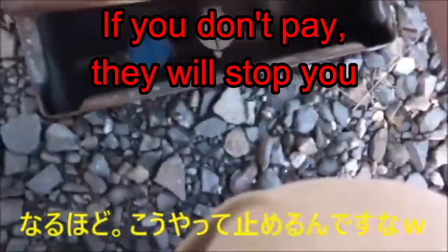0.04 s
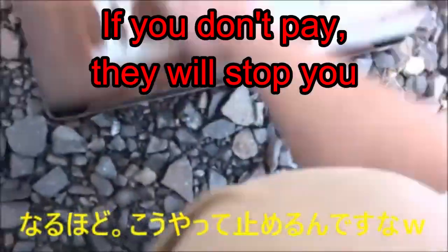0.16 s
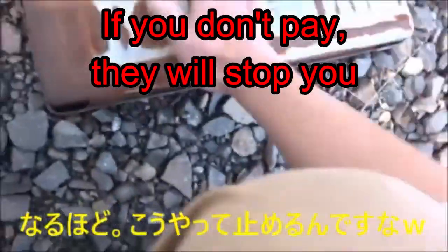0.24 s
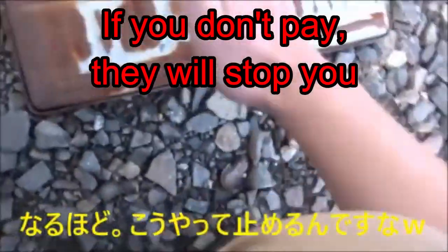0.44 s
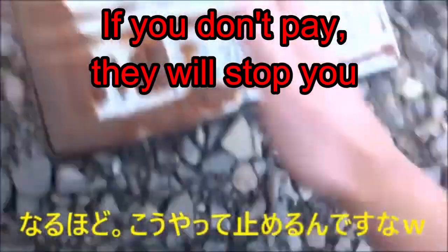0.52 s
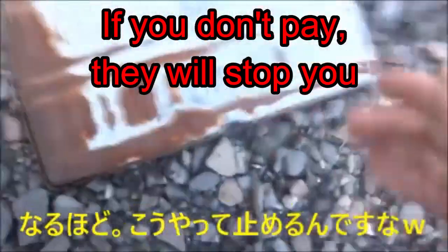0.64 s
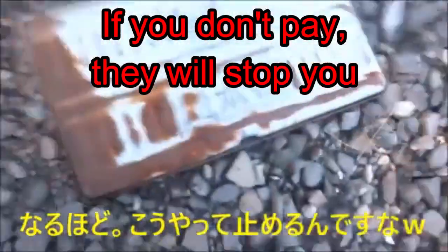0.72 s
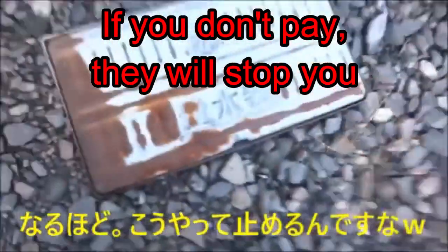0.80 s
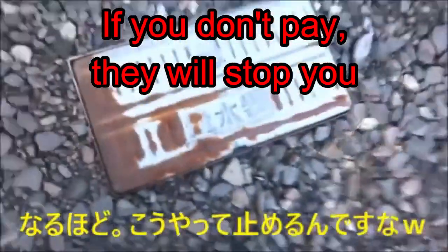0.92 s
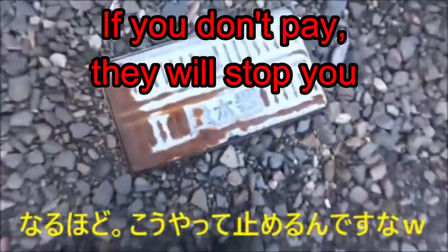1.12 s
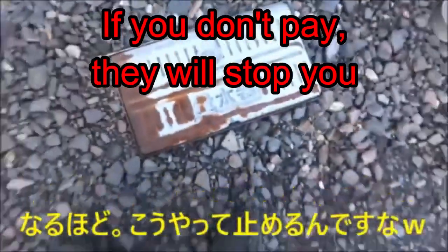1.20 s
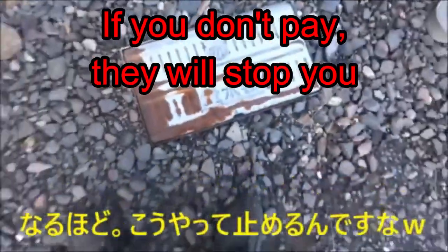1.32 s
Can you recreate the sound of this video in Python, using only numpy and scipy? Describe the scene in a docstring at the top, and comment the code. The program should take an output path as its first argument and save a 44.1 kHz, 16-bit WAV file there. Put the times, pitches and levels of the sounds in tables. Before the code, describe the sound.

A rusty metal lid slams shut on a hollow box outdoors. After a soft bump and gritty click at the start, it lands at about 0.2 seconds with a thump, then bounces, scrapes and squeals briefly as stones crunch below. It jams home around 0.45 seconds and rings out. Soft bumps and small clicks follow from 0.7 to 1 second, then light gravel scuffs near 1.3 seconds over quiet air.

```python
"""Over quiet outdoor air, a soft bump and a gritty click precede the slam of a rusty sheet-metal lid.
Its edge ticks on the rim and its box, standing on gravel, resonates with a hollow thump.
The lid bounces and scrapes, exciting the steel's modes; friction squeals and stones crunch below.
It jams home and rings out; soft bumps, small clicks and gravel scuffs follow.
The recorder's gain control, which ducks under the slam, recovers slowly to the end."""
import sys
import numpy as np
from scipy import signal
from scipy.fft import rfft, irfft
from scipy.io import wavfile
from scipy.ndimage import uniform_filter1d

SR = 44100
rng = np.random.default_rng(int(sys.argv[2]) if len(sys.argv) > 2 else 0)


def write(x):
    x = np.atleast_2d(x).T
    wavfile.write(sys.argv[1], SR, np.round(np.clip(x, -1, 1) * 32767).astype(np.int16))


N = 59535
TIME = np.arange(N) / SR


def undb(db):
    """Amplitude ratio of a level in decibels."""
    return 10 ** (np.asarray(db) / 20)

def fade(t, t60):
    """Exponential damping: 60 dB of decay in t60 seconds."""
    return np.exp(-np.log(1000) * np.maximum(t, 0) / t60)

def unit(x):
    """Normalisation to unit energy."""
    return x / np.sqrt(np.sum(x ** 2) + 1e-18)

def through(x, response):
    """Convolution: a linear system answers each input sample with its impulse response."""
    return signal.fftconvolve(x, response)[:N]

def colour(x, spectrum):
    """Minimum-phase filtering through points of (frequency [Hz], gain [dB])."""
    size = 4096
    hz, db = np.array(spectrum, float).T
    bin_hz = np.arange(size // 2 + 1) * SR / size
    gain = undb(np.interp(np.log(bin_hz + 1), np.log(hz), db))
    cepstrum = irfft(np.log(gain))
    cepstrum[1:size // 2] *= 2  # folding the cepstrum makes the filter causal
    cepstrum[size // 2 + 1:] = 0
    return through(x, irfft(np.exp(rfft(cepstrum))))

def noise(spectrum):
    """Spectral shaping of white noise, scaled to unit rms."""
    return unit(colour(rng.standard_normal(N), spectrum)) * np.sqrt(N)

def wander(rate_hz):
    """Random modulation: smoothed noise of unit standard deviation."""
    width = int(SR / rate_hz)
    smooth = uniform_filter1d(uniform_filter1d(rng.standard_normal(N), width), width)
    return smooth / smooth.std()

def resonance(start, hz, db, rise, t60):
    """Damped oscillator: a sine that swells linearly and decays exponentially."""
    t = np.maximum(TIME - start, 0)
    return undb(db) * np.minimum(t / rise, 1) * fade(t - rise, t60) * np.sin(2 * np.pi * hz * t)

def burst(start, db, t60, spectrum):
    """Broadband transient: noise with a sudden onset and exponential decay."""
    return undb(db) * (TIME >= start) * fade(TIME - start, t60) * noise(spectrum)

# Spectra of the air, mid and side (frequency [Hz], relative density [dB])
AIR_MID_SPECTRUM = [(25, -1.5), (70, 1.5), (150, -2), (280, -1), (450, -13), (800, -12), (1300, -26.5),
                    (3000, -25), (6000, -27), (10000, -27.5), (13000, -35.5)]
AIR_SIDE_SPECTRUM = [(30, -8.5), (150, -8.5), (400, -5), (700, -0.5), (1300, -11), (3000, -15.5),
                     (6000, -27), (10000, -27.5), (13000, -23.5)]
def outdoor_air():
    """Ambient noise: uncorrelated mid and side signals give a steady, low background its width."""
    return undb(-38.5) * noise(AIR_MID_SPECTRUM), undb(-48) * noise(AIR_SIDE_SPECTRUM)

# Handling bumps (time [s], frequency [Hz], level [dB], rise [s], t60 [s])
BUMP_MODES = [(0.004, 211.4, -32, 0.0062, .12), (0.66, 137, -9.5, 0.0063, 0.012),
              (0.703, 138, -15, 0.0033, 0.095), (0.735, 118, -13.5, 0.0022, .04),
              (0.7617, 193, -9, 0.0023, 0.029), (0.768, 98.4, -12, .004, 0.053)]
def handling_bumps():
    """Soft impacts excite only low, heavily damped resonances."""
    return sum(resonance(*row) for row in BUMP_MODES)

# Gravel scuffs (peak time [s], standard deviation [s], level [dB])
SCUFF_SWELLS = [(0.005, 0.035, -44.5), (0.668, 0.023, -41.5), (0.735, 0.061, -48), (1.19, 0.028, -47),
                (1.271, 0.019, -33), (1.345, 0.017, -35)]
# Spectrum of shifting stones (frequency [Hz], relative density [dB])
GRAVEL_SPECTRUM = [(300, -22), (1200, -10), (2400, 4.5), (4500, 1), (9000, 3.5), (13000, 0.5)]
def gravel_scuffs():
    """Granular friction: shifting stones give short swells of grainy noise."""
    swell = sum(undb(db) * np.exp(-.5 * ((TIME - peak) / width) ** 2)
                for peak, width, db in SCUFF_SWELLS)
    return swell * noise(GRAVEL_SPECTRUM) * undb(1.4 * wander(710))

# Clicks of metal and stone (time [s], frequency [Hz], level [dB], t60 [s])
CLICK_MODES = [(0.035, 9400, 0, 0.0015), (0.035, 5940, -19.5, 0.0036), (0.7975, 1925, -16, 0.0059),
               (0.989, 1700, -24, 0.0035)]
def small_clicks():
    """Hard, brief contacts excite high resonances that die within milliseconds."""
    return sum(resonance(start, hz, db, 2 / SR, t60) for start, hz, db, t60 in CLICK_MODES)

# Spectrum of the grit (frequency [Hz], relative density [dB])
GRIT_SPECTRUM = [(500, -27), (3000, -30), (6500, -0.5), (9800, -9), (13000, -7)]
def grit():
    """A decaying noise transient gives the first click a gritty tail."""
    return burst(start=0.0356, db=-22, t60=0.027, spectrum=GRIT_SPECTRUM)

# Edge strikes on landing and after the bounce (time [s], level [dB], t60 [s])
EDGE_STRIKES = [(0.2268, -10, .03), (0.3005, -3, .05)]
# Spectrum of a strike (frequency [Hz], relative density [dB])
EDGE_SPECTRUM = [(200, -6.5), (1000, -5.5), (2000, 2.5), (4500, 0), (7500, -1.5), (10500, 1), (13000, 0)]
def edge_ticks():
    """A short impact has a broad spectrum: the lid's edge ticks on the rim."""
    return sum(burst(*row, EDGE_SPECTRUM) for row in EDGE_STRIKES)

# Thumps of the box (time [s], frequency [Hz], level [dB], rise [s], t60 [s])
BOX_MODES = [(0.2285, 127.7, 10, .011, 0.027), (0.231, 208.7, 2.5, 0.015, 0.12),
             (0.259, 126.8, 0.5, 0.016, 0.12), (0.285, 84, -4.5, .012, 0.073),
             (0.434, 124.4, -10, 0.013, 0.21), (0.453, 72.7, -10.5, 0.031, 0.17),
             (0.51, 102.2, -26.5, 0.013, 0.76)]
def box_thumps():
    """Free vibration: the struck hollow box sounds its low resonances."""
    return sum(resonance(*row) for row in BOX_MODES)

def dense_modes(spacing_hz=65.14):
    """A thin plate has constant modal density: one mode of random pitch and phase in each equal band."""
    bands = np.arange(1, 500)
    bins = (bands + rng.random(len(bands))) * spacing_hz * N / SR
    lines = np.zeros(N // 2 + 1, complex)
    lines[np.minimum(bins.astype(int), N // 2)] = np.exp(2j * np.pi * rng.random(len(bands)))
    return irfft(lines, N)

def sheet_response(spectrum, t60):
    """Impulse response of thin steel: fast-dying modes, weaker and duller lingering ones, a crack."""
    fast = unit(dense_modes() * fade(TIME, t60))
    lingering = colour(unit(dense_modes() * fade(TIME, t60=0.65)), [(3500, 0.0022), (9000, -8.5)])
    crack = unit(rng.standard_normal(N) * fade(TIME, t60=0.011))
    return unit(colour(fast + undb(-14) * lingering + undb(-5) * crack, spectrum))

def contact_force(start, length):
    """Force envelope of a contact: sudden, easing while it lasts, then falling steeply."""
    progress = np.maximum(TIME - start, 0) / length
    return (TIME >= start) * np.exp(-0.31 * progress) / np.sqrt(1 + progress ** 20)

# Contacts of lid and rim, driving both clatter and clang (time [s], duration [s], clatter level [dB],
# bass gain [dB], treble gain [dB], clang level [dB], seated share [0-1])
RIM_CONTACTS = [(0.2328, .021, 3, 3, -4.5, -6, 0.05), (0.257, 0.02, -2, 7.5, 2.5, -2.5, 0.09),
                (0.283, 0.0029, -0.5, 16.5, 4.5, 2.5, 0.32), (0.286, 0.0042, -8.5, 7, -11, -13.5, 0),
                (0.3001, .016, -5, -3.5, 10, 0.5, 0), (0.32, 0.015, 0.5, -0.5, 6, 3, 0.07),
                (0.339, 0.018, -3.5, -4, 5, -6, 0), (0.362, .022, -1.5, -9, 2, -5, 0),
                (0.384, 0.022, -4, -2.5, 7.5, -8.5, 0.03), (0.408, .022, -1, -6, 8.5, -6.5, 0.62),
                (0.428, 0.039, -8, 4, -1, 3.5, 1), (0.478, 0.027, -8, 5.5, -20.5, -35, 0.68),
                (0.518, 0.08, -29.5, 8.5, -7, -33, 0)]
# Spectra of the sheet, loose and seated (frequency [Hz], relative density [dB])
LOOSE_SPECTRUM = [(60, -31), (190, 0.5), (420, 0.5), (600, -11), (900, 5), (1500, -4), (2700, 2.5),
                  (4300, -2.5), (6500, -6), (9500, -10.5), (13000, -18)]
SEATED_SPECTRUM = [(60, -5.5), (180, -5.5), (300, -0.5), (550, -10), (1000, -3.5), (2200, -6), (3300, -2.5),
                   (4700, -1.5), (6300, -12), (9500, -21.5), (13000, -33.5)]
def lid_clatter(impacts_per_s=1100, spread_db=4):
    """Roughness excitation: each contact is a run of tiny impacts of rusty edges shaking the sheet."""
    loose_force, seated_force = 0, 0
    for start, length, db, bass_db, treble_db, _, seated in RIM_CONTACTS:
        hits = rng.random(N) < impacts_per_s / SR
        impacts = hits * undb(spread_db * rng.standard_normal(N))
        impacts *= np.sign(rng.standard_normal(N))
        impacts[int(start * SR) + 1] = 2  # the opening blow
        force = unit(impacts * contact_force(start, length)) * np.sqrt(length * SR) * undb(db)
        force = colour(force, [(400, bass_db), (1600, 0), (2500, 0), (10000, treble_db)])
        share = np.clip(seated, 0, 1)
        loose_force += np.sqrt(1 - share) * force
        seated_force += np.sqrt(share) * force
    return (through(loose_force, sheet_response(LOOSE_SPECTRUM, t60=0.1))
            + through(seated_force, sheet_response(SEATED_SPECTRUM, t60=0.25)))

# Main modes of the lid (frequency [Hz], t60 [s], drive when loose [dB], drive when seated [dB],
# relative level of the lingering ring [dB])
MAIN_MODES = [(301.5, 0.34, -40.5, -5.5, -47), (327, 0.24, -3.5, -16.5, -44.5),
              (417.9, 0.5, -10, -27.5, -47.5), (817, 0.25, -17.5, -11.5, -44.5),
              (1166.5, 0.35, -7, -16, -41), (1198, .23, -2.5, -21.5, -36), (1433, .15, -16, -13, -42),
              (1697, 0.14, -15.5, -14, -29), (1850, 0.18, -14.5, -7, -33.5), (2063, .4, -24.5, -19.5, -27),
              (2434, 0.47, -21, -23, -27), (2533, 0.27, -24.5, -9.5, -44.5), (2535, .3, -10, -33, -44.5),
              (3126, .21, -17, -16, -40.5), (3190, 0.54, -12.5, -32, -29.5), (3623, 0.16, -12.5, -16, -37),
              (4134, 0.26, -7.5, -23.5, -44), (4510, 0.22, -14.5, -28, -38), (4750, .25, -13, -34, -42.5),
              (6826, .2, -15, -28.5, -52.5), (7770, .16, -25, -29.5, -48), (9261, .18, -17.5, -32, -46),
              (10400, .16, -28, -27.5, -49), (11050, .18, -18.5, -37, -44)]
def lid_clang(wander_hz=7.5, flutter_db=4.5, linger_t60=1.16):
    """Modal superposition: modes store each contact's energy, waver in pitch while rubbed, ring on."""
    loose_power, seated_power, rubbing, clang = 0, 0, 0, 0
    for start, length, _, _, _, clang_db, seated in RIM_CONTACTS:
        force = contact_force(start, length)
        power = (force * undb(clang_db)) ** 2
        share = np.clip(seated, 0, 1)
        loose_power += (1 - share) * power
        seated_power += share * power
        rubbing += force
    for hz, t60, loose_db, seated_db, linger_db in MAIN_MODES:
        decay = unit(fade(TIME, t60) + undb(linger_db) * fade(TIME, linger_t60))
        drive = loose_power * undb(loose_db) ** 2 + seated_power * undb(seated_db) ** 2
        energy = through(drive, decay ** 2)
        pitch = hz + wander_hz * rubbing * wander(200)
        phase = 2 * np.pi * (np.cumsum(pitch) / SR + rng.random())
        flutter = undb(flutter_db * wander(40))
        clang += np.sqrt(np.abs(energy)) * flutter * np.sin(phase)
    return clang

# Friction tones (time [s], duration [s], frequency [Hz], level [dB])
SQUEAL_TONES = [(0.261, 0.014, 1135, 3), (0.303, .028, 1194, 0.5), (0.301, 0.034, 3502, -0.5),
                (0.441, 0.048, 1702, -10), (0.594, 0.029, 1702, -26)]
def rim_squeals(rise_s=0.0099, t60=0.061, wander_hz=14):
    """Stick-slip friction locks onto a single mode and sustains it for a moment."""
    squeals = 0
    for start, length, hz, db in SQUEAL_TONES:
        swell = np.clip((TIME - start) / rise_s, 0, 1) * fade(TIME - start - length, t60)
        pitch = hz + wander_hz * wander(270)
        squeals += undb(db) * swell * np.sin(2 * np.pi * np.cumsum(pitch) / SR)
    return squeals

# Spectrum of grinding stones (frequency [Hz], relative density [dB])
CRUNCH_SPECTRUM = [(40, -4), (100, -2), (280, 0), (520, -1), (1000, -4), (1800, -15), (4000, -16),
                   (7000, -25), (12000, -22)]
def stone_crunch(db):
    """Granular friction under load: stones grind as the box rocks at the bounce."""
    return burst(start=0.3005, db=db, t60=0.13, spectrum=CRUNCH_SPECTRUM)

def scene():
    """Mid-side stereo: lid and box are central; stones, handling and air spread to the sides."""
    bumps = handling_bumps()
    mid = bumps + small_clicks() + edge_ticks() + grit() + box_thumps()
    mid += lid_clatter() + lid_clang() + rim_squeals()
    mid += stone_crunch(db=-9) + gravel_scuffs()
    side = stone_crunch(db=-1) + undb(-9) * gravel_scuffs()
    side += undb(-4) * signal.hilbert(bumps).imag  # a quarter-cycle shift widens the bumps
    air_mid, air_side = outdoor_air()
    mid, side = mid + air_mid, side + air_side
    return np.array([mid + side, mid - side])

def record(dry, threshold_db=-8, detect_s=0.004, recover_db_per_s=3.5):
    """Automatic gain control with fast attack and slow release, plus clipping and band limiting."""
    rumble_cut = signal.butter(2, 46, "high", fs=SR, output="sos")
    treble_cut = signal.ellip(10, .2, 80, 12950, fs=SR, output="sos")
    dry = signal.sosfilt(rumble_cut, dry)
    power = uniform_filter1d(np.mean(dry ** 2, axis=0), int(detect_s * SR))
    excess_db = np.maximum(10 * np.log10(np.abs(power) + 1e-12) - threshold_db, 0)
    recovery_db = recover_db_per_s * TIME
    duck_db = np.maximum.accumulate(excess_db + recovery_db) - recovery_db
    ceiling = undb(-1.2)
    return signal.sosfilt(treble_cut, np.clip(dry * undb(-duck_db), -ceiling, ceiling))

dry = scene()
out = record(dry)
write(out)
```